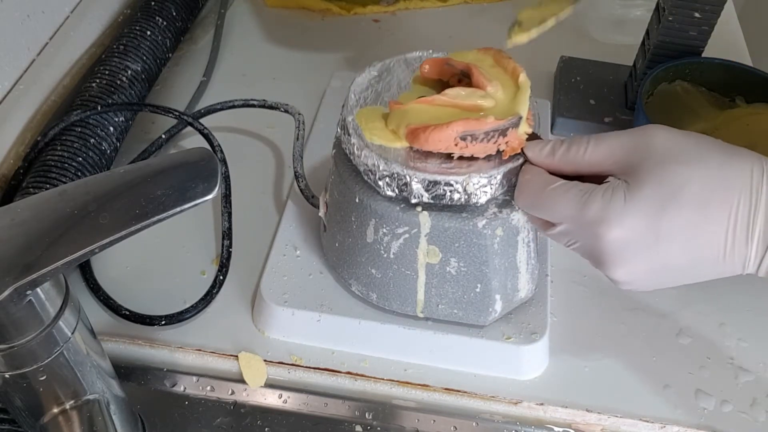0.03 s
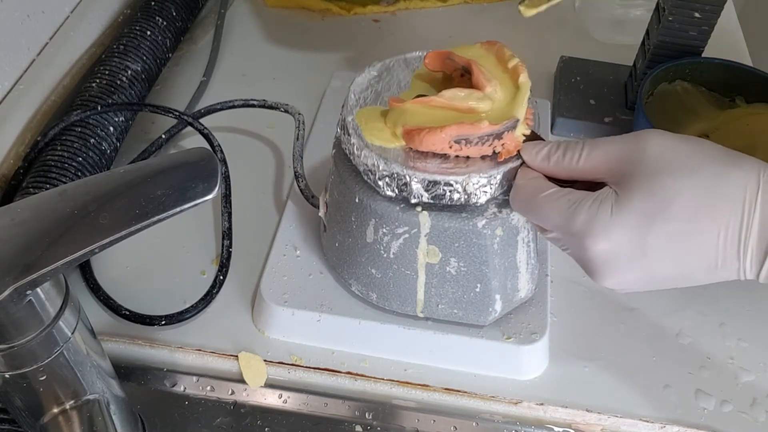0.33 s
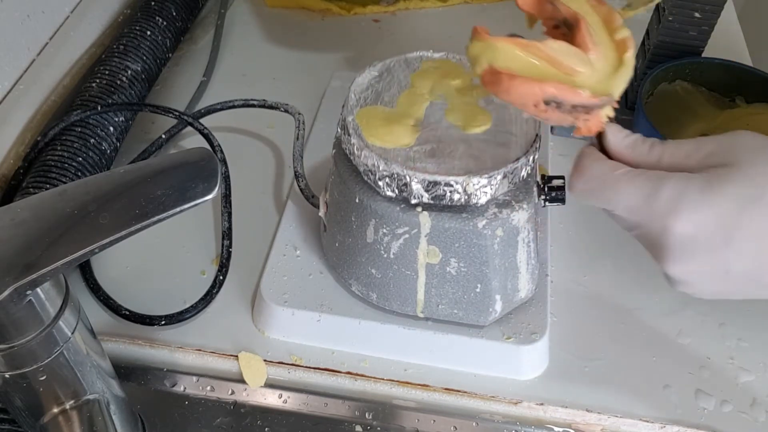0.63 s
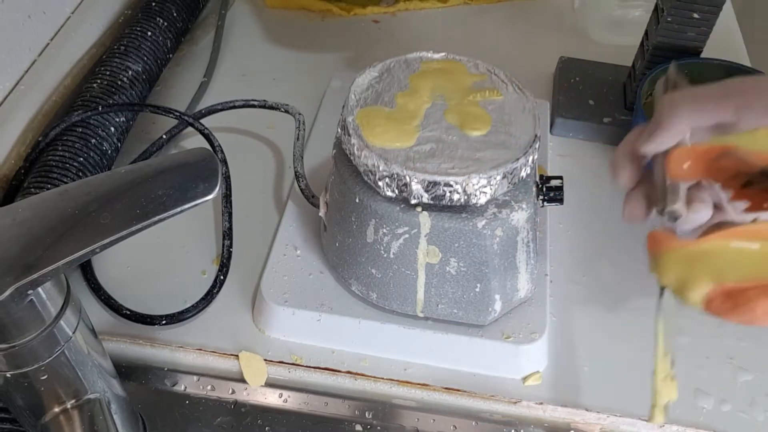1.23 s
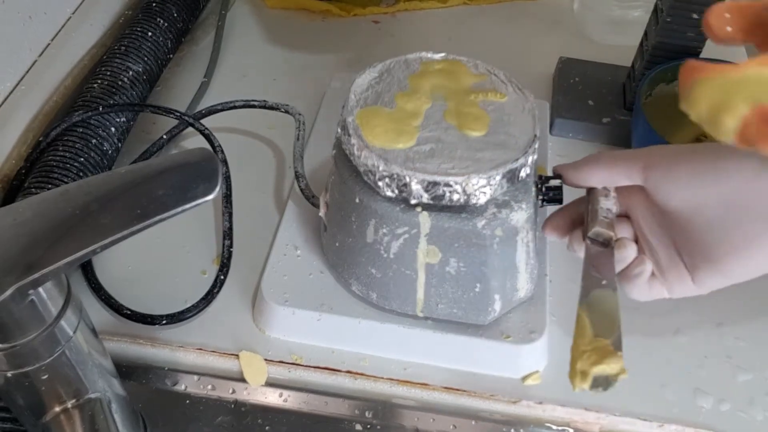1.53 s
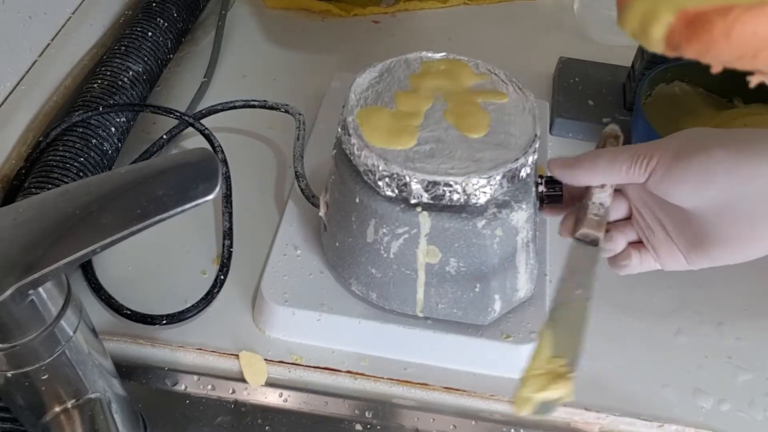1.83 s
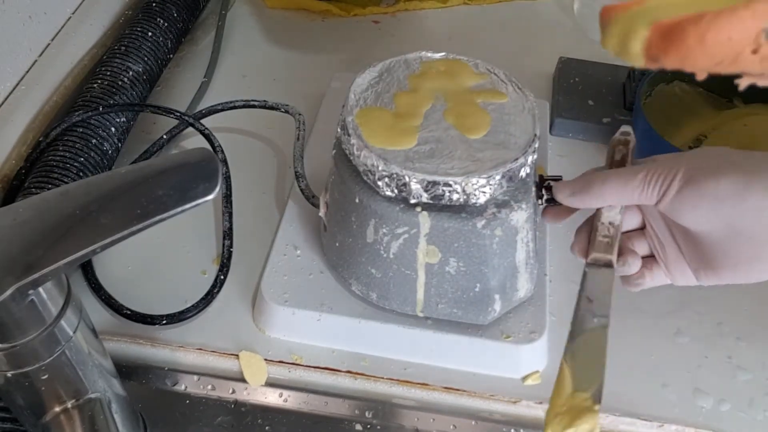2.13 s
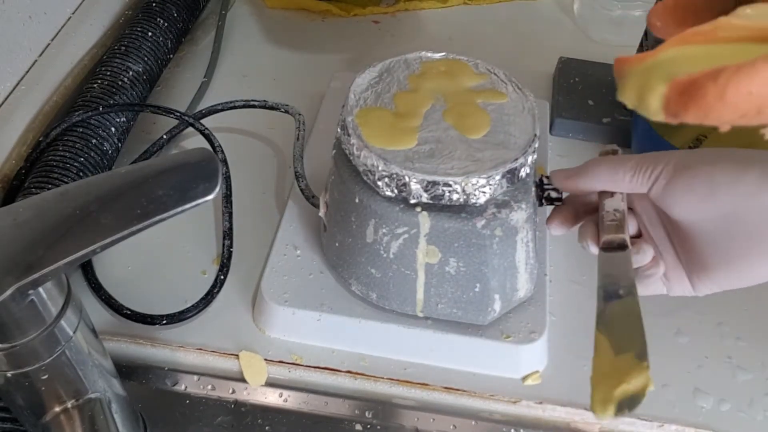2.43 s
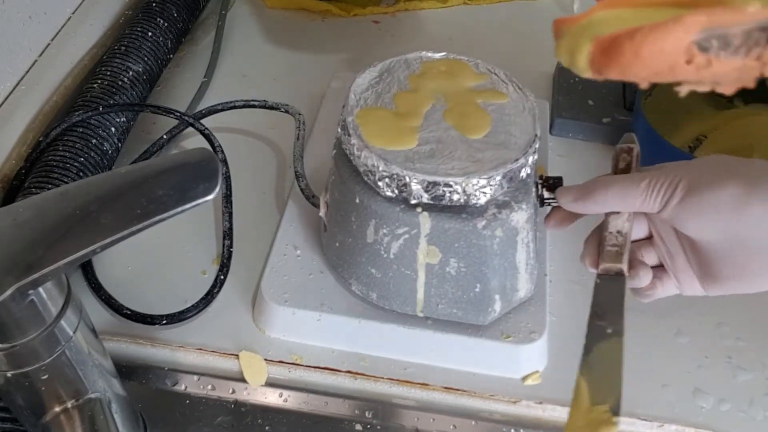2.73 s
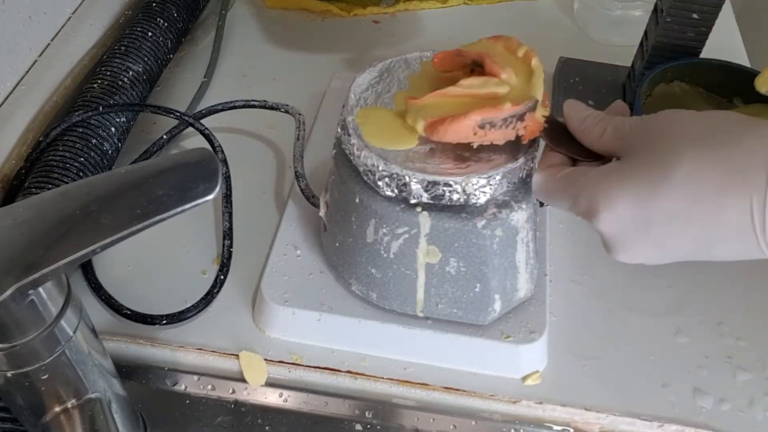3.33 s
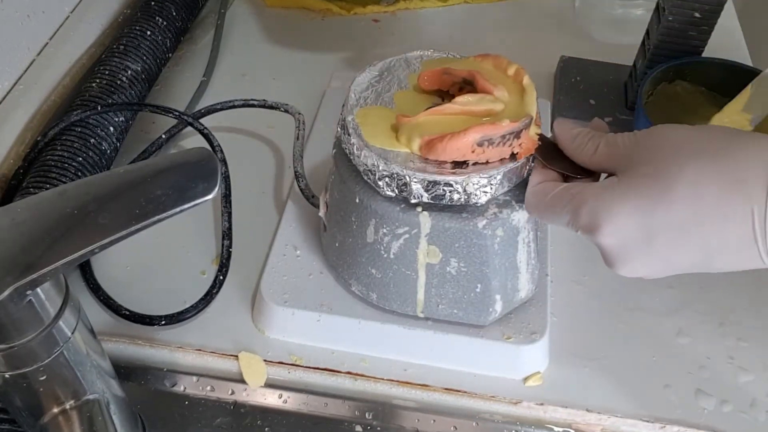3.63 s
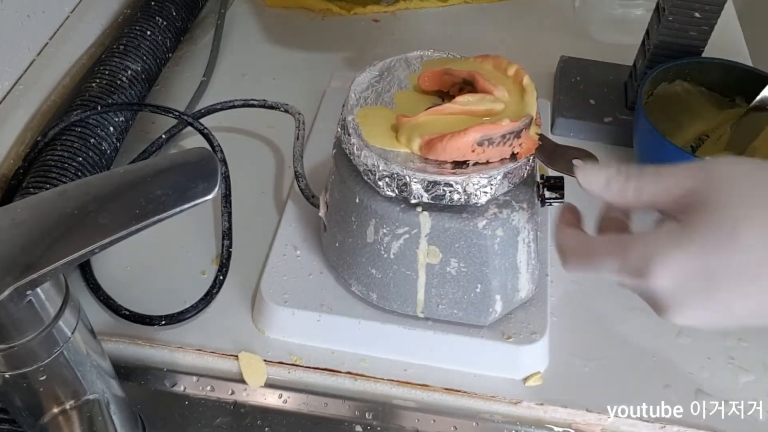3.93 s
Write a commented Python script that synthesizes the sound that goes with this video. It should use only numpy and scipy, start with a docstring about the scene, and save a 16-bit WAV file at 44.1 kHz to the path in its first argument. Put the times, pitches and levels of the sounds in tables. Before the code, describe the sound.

A small vibrating machine hums and buzzes, is turned down, then clicks off.

```python
"""A small room with a low rumble; a stereo microphone close to a plaster vibrator on the worktop.
The mains-driven machine hums, its foil-wrapped plate buzzes and an impression tray rattles on top.
By 0.8 s the tray is lifted off and the bare plate rings. From about 2 s the knob is turned down in
steps; at 2.9 s it snaps off. Then a glove rustles, and tray and spatula tick lightly as the tray is
set back with a short scrape."""
import sys
import numpy as np
from scipy import signal
from scipy.fft import rfft, irfft
from scipy.io import wavfile

SR = 44100
rng = np.random.default_rng(int(sys.argv[2]) if len(sys.argv) > 2 else 0)


def dump_mix(stems):
    """Bounce the given channels to the path in sys.argv[1] as a 16-bit WAV at rate SR."""
    frames = np.atleast_2d(stems).T  # one column per channel
    limited = np.clip(frames, -1, 1)  # hard clip at full scale
    pcm = np.round(limited * 32767).astype(np.int16)
    wavfile.write(sys.argv[1], SR, pcm)


N = 176400
TIME = np.arange(N) / SR
BEAT_HZ = 120.08  # the magnet pulls twice per mains cycle


def undb(db):
    """Decibels to gain."""
    return 10 ** (np.asarray(db) / 20)

def unit(x):
    """Scale to rms 1."""
    return x / np.sqrt(np.mean(x ** 2) + 1e-20)

def curve(rows):
    """Join (t/s, value) rows by straight lines."""
    return np.interp(TIME, *np.array(rows).T)

def pan(db):
    """Channel gains, the left louder by `db`."""
    return undb(np.array([[db], [-db]]) / 2)

def fade(t, t60):
    """Exponential decay that starts at t = 0."""
    return np.exp(-np.log(1000) * np.maximum(t, 0) / t60)

def walk(rate):
    """Random wandering of rms 1, about `rate` turns a second."""
    steps = rng.standard_normal(4096)
    return unit(np.interp(TIME * rate, np.arange(len(steps)), steps))

def add(out, x, start):
    """Mix a short sound in at a time in seconds."""
    i = int(start * SR)
    out[:, i:i + x.shape[-1]] += x[:, :N - i]

def colour(x, points):
    """Minimum-phase filter of unit energy, shaped by (f/Hz, level/dB) rows."""
    hz, db = np.array(points).T
    size = 2048
    shape = np.interp(np.log(np.arange(size // 2 + 1) * SR / size + 1), np.log(hz), db)
    cepstrum = irfft(np.log(undb(shape)))
    cepstrum[1:size // 2] *= 2
    cepstrum[size // 2 + 1:] = 0
    ir = irfft(np.exp(rfft(cepstrum)))
    return signal.oaconvolve(np.atleast_2d(x), ir[None] / np.linalg.norm(ir), axes=1)[:, :x.shape[-1]]

def room(x, wet_db, t60=0.18, gap_s=0.00214):
    """Direct sound, then a short tail off the near walls, different in each channel."""
    t = np.arange(SR // 4) / SR
    ir = rng.standard_normal((2, len(t))) * fade(t, t60) * (t > gap_s)
    ir *= undb(wet_db) / np.linalg.norm(ir, axis=1, keepdims=True)
    ir[:, 0] += 1
    return signal.fftconvolve(x, ir / np.hypot(1, undb(wet_db)), axes=1)[:, :N]


# rumble and hiss of the room: f/Hz, level/dB
ROOM_TONE = [(20, -21), (35, -10), (50, 4), (70, -3), (110, -10.5), (170, -10.5), (240, -19.5), (330, -16),
             (450, -22.5), (600, -26), (950, -28), (1400, -35), (2200, -50.5), (4000, -56.5), (9000, -55),
             (12700, -52.5), (15800, -63)]
def room_tone(wide_above_hz=356):
    """The air around the microphone, centred in the bass and wide above."""
    hz = np.maximum(np.arange(N // 2 + 1) * SR / N, 1)
    points_hz, db = np.array(ROOM_TONE).T
    shape = undb(np.interp(np.log(hz), np.log(points_hz), db))
    mid, side = rfft(rng.standard_normal((2, N))) * shape
    side *= hz / np.hypot(hz, wide_above_hz)
    return undb(-47) * unit(irfft(np.array([mid + side, mid - side]), N))

def rub(shape, start_s, end_s, grain_db):
    """Grainy friction that swells and dies away."""
    swell = np.sin(np.pi * np.clip((TIME - start_s) / (end_s - start_s), 0, 1))
    grains = unit(rng.standard_normal(N) * undb(grain_db * walk(300)))
    return room(colour(grains * swell, shape), wet_db=1.5)

# friction spectra of tray and glove: f/Hz, level/dB
TRAY_SCRAPE = [(700, -13), (2200, 6), (4000, -5), (6500, -4), (8600, -2), (11000, -20), (15500, -20)]
GLOVE_RUSTLE = [(1000, 1), (2300, 0.5), (4000, -7), (7000, -4), (10000, -2), (12400, 7), (14000, -7),
                (16000, -3)]
def handling():
    """The tray scrapes as it is set back, amid the faint rustle of the glove."""
    scrape = undb(-49.5) * rub(TRAY_SCRAPE, 3.512, 3.572, grain_db=-0.5)
    rustle = undb(-66.5) * rub(GLOVE_RUSTLE, 3.04, 3.68, grain_db=-2)
    return scrape + rustle

def knock(modes, crack, crack_t60, ring_db):
    """One contact: a brief crack and the modes it rings, reaching each channel by its own path."""
    t = np.arange(SR // 6) / SR
    burst = colour(rng.standard_normal((2, len(t))) * fade(t, crack_t60), crack)
    ring = sum(undb(db) * np.sin(2 * np.pi * (hz * t + rng.random((2, 1)))) * fade(t, t60)
               for hz, db, t60 in modes)
    return np.sqrt(2) * (burst / np.linalg.norm(burst) + undb(ring_db) * ring / np.linalg.norm(ring))

# contacts of knob, tray and spatula: t/s, level/dB, left over right/dB, favoured f/Hz
TICKS = [(2.012, -13, -2, 6000), (2.114, -17, -1, 6000), (2.1622, -15.5, -1, 6000), (2.2326, -27, -1, 8500),
         (2.394, -22.5, -2, 5300), (2.653, -30, 5, 6400), (2.7037, -28.5, 1, 4470),
         (2.791, -27.5, 2.5, 3020), (3.246, -27.5, -2, 6000), (3.3333, -31, 1, 6300), (3.53, -27, 5, 8500),
         (3.543, -26, -2, 2600), (3.5899, -20.5, 2, 9150), (3.783, -44, 0, 12600), (3.8897, -18.5, 0, 3950)]
# their modes: f/Hz, level/dB, t60/s
TICK_MODES = [(2440, -6, .04), (3250, -10, .03), (3934, -3.5, 0.0393), (4040, -7, .03), (4850, -8.5, 0.037),
              (5860, -6.5, 0.044), (6130, -5.5, 0.046), (6410, -6, 0.035), (8400, -9, .04), (8870, -8, .04),
              (10920, -6, .04), (12080, -7, 0.048)]
# their crack: f/Hz, level/dB
TICK_CRACK = [(800, -11.5), (2400, -5.5), (4000, -3.5), (5000, -2.5), (6000, 2), (7200, -6.5), (8500, 4.5),
              (10000, -2.5), (12000, -2.5), (14500, -7.5), (16000, -22.5)]
def ticks(favour_db=11.5, favour_octaves=0.15):
    """Small hard contacts to either side of the microphone; the spot struck favours some modes."""
    out = np.zeros((2, N))
    for start, db, pan_db, favoured_hz in TICKS:
        modes = []
        for hz, level, t60 in TICK_MODES:
            nearness = np.exp(-(np.log2(hz / favoured_hz) / favour_octaves) ** 2)
            modes.append((hz, level + favour_db * nearness, t60))
        add(out, undb(db) * pan(pan_db) * knock(modes, TICK_CRACK, crack_t60=0.039, ring_db=-1), start)
    return room(out, wet_db=-4)

# the switch's release, slide, strike and bounce: t/s, level/dB
SWITCH_CONTACTS = [(2.8901, -7), (2.893, -1.5), (2.8945, 2), (2.8966, 2), (2.9034, -6.5)]
# modes of switch and housing: f/Hz, level/dB, t60/s
SWITCH_MODES = [(892, -3.5, .06), (1386, -12.5, 0.11), (2790, -11, .04), (3670, -9.5, .04),
                (4200, -3, .045), (4400, -8, .04), (5565, 0, 0.074), (6530, -10, 0.056), (7100, -10, .06),
                (8540, 3.5, 0.047), (10100, 0, 0.054), (11200, -6.5, .05), (12320, 4.5, 0.045)]
# its crack: f/Hz, level/dB
SWITCH_CRACK = [(300, -24.5), (680, -18.5), (910, -1.5), (1120, -14.5), (1450, -13.5), (2000, -9.5),
                (3000, -1), (3650, 1), (4250, 7), (4900, -3.5), (6800, 1.5), (8500, 5), (11000, 2.5),
                (12400, 1.5), (13800, -5.5), (15800, -5.5)]
def switch():
    """The knob passes its detent and the switch snaps open, close and nearly centred."""
    out = np.zeros((2, N))
    for start, db in SWITCH_CONTACTS:
        add(out, undb(db + 2.5) * knock(SWITCH_MODES, SWITCH_CRACK, crack_t60=0.05, ring_db=-7), start)
    return room(out, wet_db=-8.5) * pan(-0.5)

# spectrum of the shaking housing: f/Hz, level/dB
SHUDDER = [(40, -13), (90, 9), (180, 5), (250, -2), (320, 1.5), (450, -7), (600, -11.5), (750, -9),
           (1100, -8.5), (2000, -26.5), (16000, -60.5)]
def shudder(drive):
    """The housing shudders dully on the worktop."""
    return undb(-42) * colour(rng.standard_normal(N) * undb(1.3 * walk(5.97)) * drive, SHUDDER)

# spectrum of the foil: f/Hz, level/dB
FOIL_COLOUR = [(1500, -22), (3200, 1.5), (4400, -1), (6000, 0.5), (7100, -2.5), (7850, 3.5), (8800, -3),
               (9650, 0), (11200, -3), (12350, 1.5), (13300, -4), (15800, -3)]
# rise and fall of its crinkle: t/s, level/dB
FOIL_SWELL = [(0, 6), (.17, 3.5), (.35, 1.5), (.7, 2.5), (.82, -2), (.95, 1.5), (1.3, 2.5), (1.9, -0.5),
              (2.1, 0.5)]
def foil_crinkle(shake):
    """The foil wrap crackles in tiny uneven grains that pulse with the beat."""
    grains = unit(rng.standard_normal((2, N)) * undb(3.5 * np.minimum(rng.exponential(size=N), 4)))
    pulse = unit(1 + 0.21 * np.sin(beat_phase()))
    swell = undb(2.24 * walk(170) + 0.63 * walk(9.23) + curve(FOIL_SWELL))
    crinkle = colour(grains * pulse * swell * shake ** 1.03, FOIL_COLOUR)
    return undb(-41) * room(crinkle, wet_db=-2.5)

def chatter(rough, jitter_s, rebound, rebound_beats=0.42):
    """A loose part knocks once per beat and again on the way back, unevenly in size and time."""
    k = np.arange(1000)
    is_rebound = k % 2
    timing, strength = rng.standard_normal((len(k), 2)).T
    due_s = (k // 2 + 1 / 4 + is_rebound * rebound_beats) / BEAT_HZ
    drift_s = 7e-5 * walk(11)[np.minimum(due_s * SR, N - 1).astype(int)]  # loose parts shift
    at = (due_s + drift_s + jitter_s * timing) * SR
    size = np.exp(rough * np.clip(strength, -2, 2)) * np.where(is_rebound, rebound, 1) * (at < N - 10)
    taps = at.astype(int)[:, None] + np.arange(-6, 7)
    pulses = size[:, None] * np.sinc(taps - at[:, None])  # knocks fall between samples
    return unit(np.bincount(np.clip(taps, 0, N - 1).ravel(), pulses.ravel(), N))

def rattle(force, shape, rough, jitter_s, rebound, wet_db, count=4):
    """Several loose spots chatter on one beat; each reaches the microphone by its own path."""
    spots = [room(chatter(rough, jitter_s, rebound)[None] * force, wet_db) for _ in range(count)]
    return colour(sum(spots), shape) / np.sqrt(count)

def harmonic(phase, k, waver_db):
    """One multiple of the beat, wavering in level and phase."""
    level = np.sqrt(2) * undb(waver_db * walk(15))
    return level * np.sin(k * phase + np.log(undb(waver_db)) * walk(22))

# spectrum of the plate's rim: f/Hz, level/dB
RIM_COLOUR = [(1500, -33.5), (2300, -13.5), (2550, 0), (2750, -1.5), (2950, 4), (3250, -2.5), (3520, 1),
              (3800, -18), (5200, -13.5), (7000, -27), (15000, -39)]
# rise and fall of its rasp: t/s, level/dB
RIM_SWELL = [(0, -11), (.8, -3.5), (1.05, -4), (1.2, 3), (1.4, -2), (1.65, 0), (1.8, 1.5), (1.95, -2),
             (2.1, -4.5), (2.5, -4)]
def rim_rasp(shake):
    """The rim chatters, more so once the plate is bare."""
    force = shake ** 1.22 * undb(curve(RIM_SWELL))
    return undb(-43) * rattle(force, RIM_COLOUR, rough=0.45, jitter_s=5e-5, rebound=0.39, wet_db=6.5)

# spectrum of the plate: f/Hz, level/dB
PLATE_COLOUR = [(100, -23), (450, -17), (600, 3), (720, -2), (950, 2.5), (1200, -3.5), (1450, 1.5),
                (1750, -2), (2050, -0.5), (2350, -2.5), (2950, -0.5), (3450, -2.5), (4000, -3), (5100, -3),
                (6500, -10.5), (15000, -27.5)]
# its buzz as the load shifts: t/s, level/dB
PLATE_SWELL = [(0, 4.5), (.72, 0), (.84, 0.5), (1.0, 3), (1.2, 2), (1.45, 2), (1.7, 0), (1.92, 2),
               (2.1, -3)]
def plate_buzz(shake):
    """The plate's knocks run together into a buzz."""
    force = shake ** 1.32 * undb(curve(PLATE_SWELL))
    return undb(-40.5) * rattle(force, PLATE_COLOUR, rough=0.44, jitter_s=7e-5, rebound=0.5, wet_db=10)

# the tray's seating and main resonance, shifting with the grip: t/s, contact/0-1, f/Hz
TRAY_SEAT = [(0, 0.9, 1020), (.04, 0.4, 980), (.16, 0.28, 1050), (.21, 0.46, 940), (.25, 0.3, 1090),
             (.285, 0.5, 970), (.345, 0.86, 970), (.4, 0.94, 970), (.46, 0.86, 990), (.56, 0.58, 1030),
             (.64, 0.77, 975), (.69, 0.62, 1080), (.736, 0.83, 990), (.77, 0.53, 1070)]
# spectrum of its rattle: f/Hz, level/dB
TRAY_COLOUR = [(300, -17.5), (600, -8.5), (820, -14), (985, -3.5), (1080, -6.5), (1220, -11.5), (1400, -12),
               (1850, -8.5), (2150, -15.5), (2420, -7.5), (2900, -18.5), (3600, -13), (5000, -23.5),
               (8000, -24.5), (15000, -42)]
def tray_rattle(resting, width_hz=62):
    """The tray knocks on the plate and sings on whichever of two harmonics is nearer its resonance."""
    seat = np.array(TRAY_SEAT)
    contact = curve(seat[:, [0, 1]]) * resting
    ring_hz = curve(seat[:, [0, 2]])
    ring = 0
    for k in (8, 9):
        resonance = 1 / np.hypot(1, 2 * (k * BEAT_HZ - ring_hz) / width_hz)
        ring += resonance * contact * harmonic(beat_phase() + 0.045 * walk(25.5), k, waver_db=2)
    knocks = rattle(contact, TRAY_COLOUR, rough=0.72, jitter_s=6e-5, rebound=0.41, wet_db=7.5)
    return undb(-33) * ring + undb(-33.5) * knocks

# housing hum at full drive: multiple of the beat, left level/dB, right level/dB, waver/dB
HUM_HARMONICS = [(1, -14, -14, .2), (2, -40.5, -39, 1), (3, -28, -33, .45), (4, -47, -50.5, 2),
                 (5, -46.5, -48, 2)]
def hum(drive, bare, left_lag_s=0.00018):
    """The magnet makes the housing hum, and the bare plate rings at the seventh harmonic."""
    phase = beat_phase() - 2 * np.pi * BEAT_HZ * np.array([[left_lag_s], [0]])
    upper_drive = drive ** 3.1  # upper harmonics fall faster as the knob goes down
    out = undb(-49.5) * pan(8.5) * bare * upper_drive * harmonic(phase, 7, waver_db=2.5)
    for k, left_db, right_db, waver_db in HUM_HARMONICS:
        strength = drive if k <= 2 else upper_drive
        out += undb([[left_db], [right_db]]) * strength * harmonic(phase, k, waver_db)
    return out

OFF_S, COAST_HZ, COAST_T60_S = 2.908, 115, 0.25
def beat_phase():
    """The mass swings with the mains, then a little slower once switched off."""
    return 2 * np.pi * np.cumsum(np.where(TIME < OFF_S, BEAT_HZ, COAST_HZ)) / SR

# strength of the vibration, set by the knob: t/s, level/dB
KNOB_DRIVE = [(0, 0), (1.95, -0.27), (2.03, -1.5), (2.07, -4.5), (2.098, -7.5), (2.13, -5.5), (2.34, -6),
              (2.39, -7.5), (2.45, -12), (2.72, -11), (2.76, -13), (2.89, -13)]
def vibrator(tray_gone_s=0.79, lift_takes_s=0.027):
    """The machine in front of the microphone shakes its loose parts and coasts briefly to rest."""
    drive = undb(curve(KNOB_DRIVE)) * fade(TIME - OFF_S, COAST_T60_S)
    resting = np.clip((tray_gone_s - TIME) / lift_takes_s, 0, 1)
    threshold = undb(-14.5)  # below this drive nothing is shaken loose
    shake = np.maximum((drive - threshold) / (1 - threshold), 0)
    return (hum(drive, bare=1 - resting) + tray_rattle(resting) + plate_buzz(shake)
            + rim_rasp(shake) + foil_crinkle(shake) + shudder(drive))

def scene():
    """The machine, the hand's work and the room, heard from beside the worktop."""
    return vibrator() + switch() + ticks() + handling() + room_tone()

def record(dry, top_hz=15720):
    """The recorder cuts the top steeply."""
    return signal.sosfilt(signal.ellip(12, .1, 90, top_hz, fs=SR, output="sos"), dry)


dry = scene()
out = record(dry)
dump_mix(out)
```